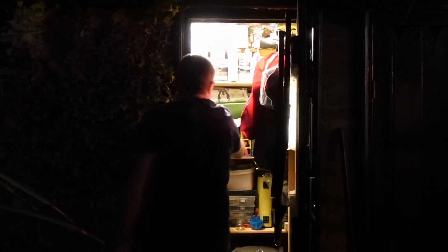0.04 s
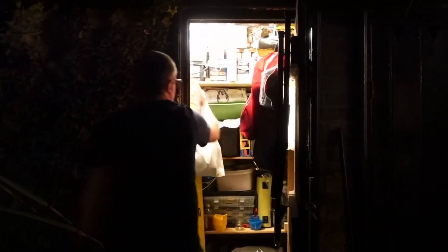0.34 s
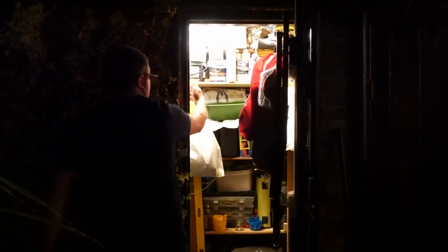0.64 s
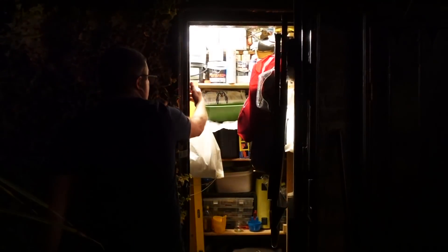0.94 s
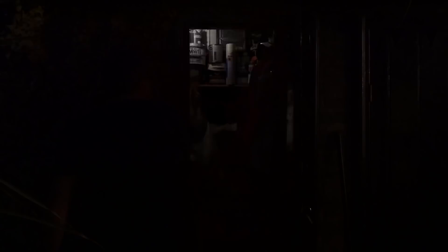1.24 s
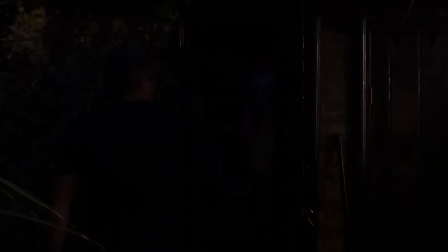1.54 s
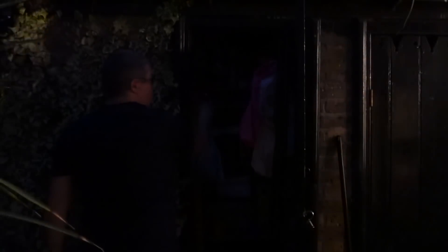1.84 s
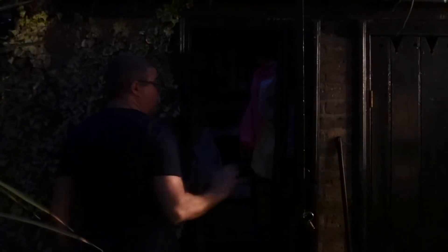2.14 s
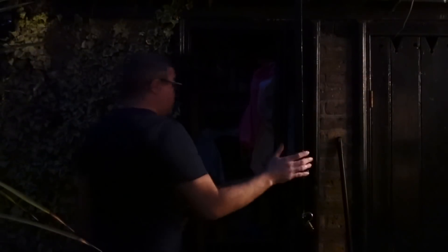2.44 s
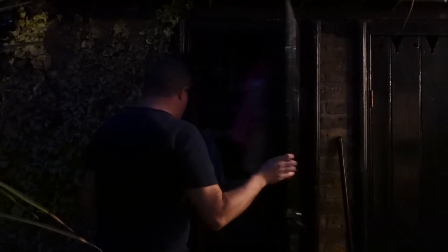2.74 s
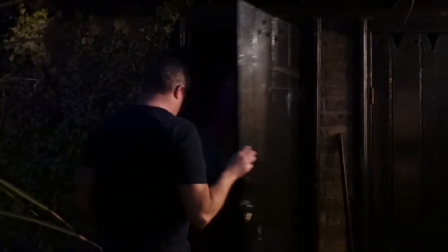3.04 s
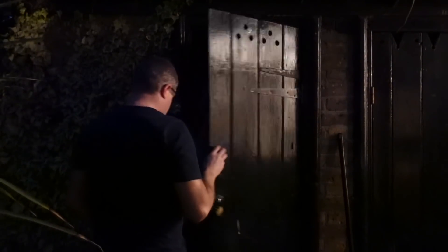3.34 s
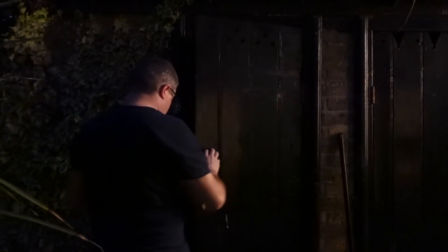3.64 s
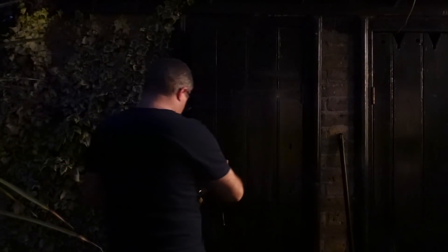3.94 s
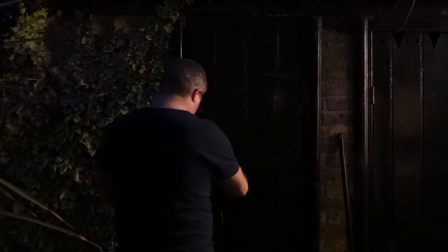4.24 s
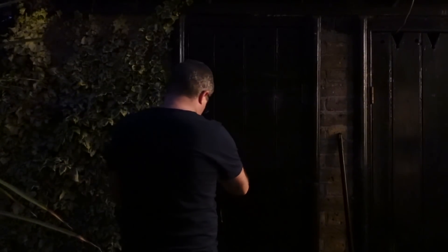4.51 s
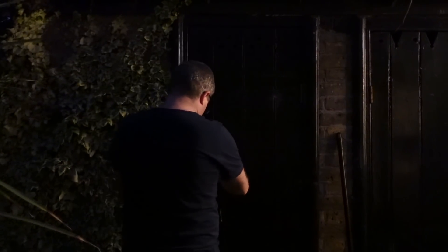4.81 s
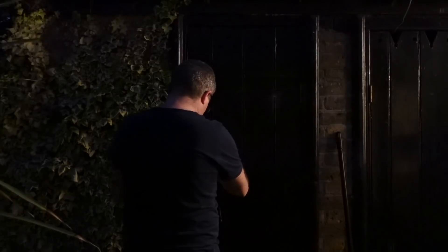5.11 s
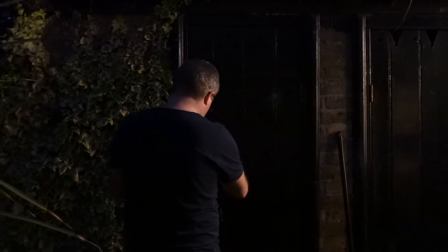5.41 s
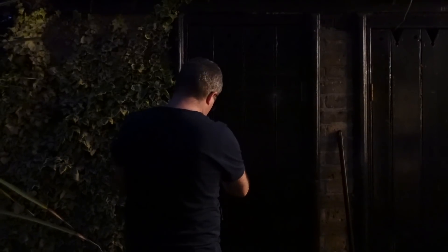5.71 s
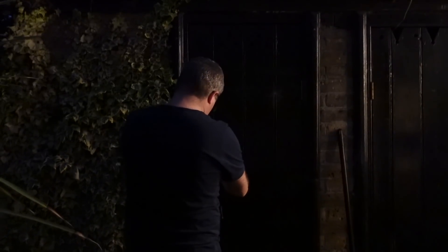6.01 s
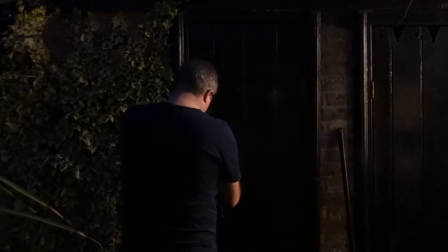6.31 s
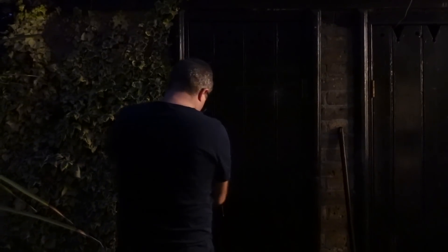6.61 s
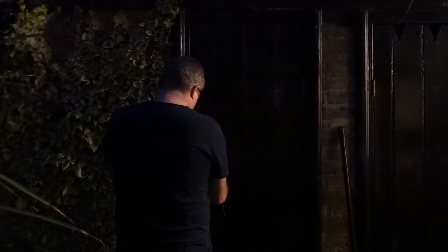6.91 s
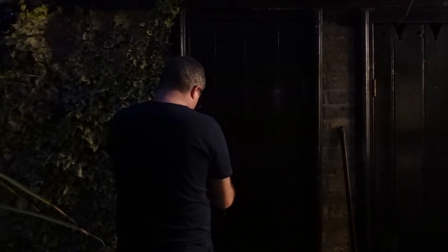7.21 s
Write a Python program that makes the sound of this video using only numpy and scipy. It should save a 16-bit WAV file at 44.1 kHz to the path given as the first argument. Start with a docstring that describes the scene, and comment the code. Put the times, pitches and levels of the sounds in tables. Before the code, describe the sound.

A faint, low rumble of distant town traffic runs throughout, in a small yard where close brick walls add a short echo. In the first second a plastic bag rustles, with light taps of things being set down and brief gritty crunches. Two light switches snap at about 1.3 and 1.7 seconds. Feet crunch on the path around 2 seconds, followed by more rustling, a few taps just after 3 seconds and another crunch at 3.7. Near 4.5 seconds a wooden door, slightly to the right, squeaks softly and shuts with a dull double thud. From 4.9 seconds its iron latch rattles and knocks, growing louder, with a short squeak at 5.6 and a ringing lock spring at 5.9. At 6.1 a stiff bolt gives a loud, high squeal with clacks and a wooden thump. A sharp clack comes at 6.8 and a last clatter at 7.2.

```python
"""A wooden shed door is pushed shut with a squeak and a thud; its iron latch rattles and a stiff bolt squeals
home, dry metal sticking and slipping. Before that, a plastic bag snaps and rustles, fingers tap the door and a
switch, feet crunch on the path and two light switches snap. Each knock is a burst of tiny impacts coloured by
the part it strikes. Close brick walls echo the knocks and squeaks over the low rumble of a distant town at
night."""
import sys
import numpy as np
from scipy import signal
from scipy.fft import rfft, irfft, next_fast_len
from scipy.io import wavfile
from scipy.ndimage import map_coordinates

SR = 44100
rng = np.random.default_rng(int(sys.argv[2]) if len(sys.argv) > 2 else 0)


def put_to_file(sound):
    """Save the sound as 16-bit audio at rate SR, in the file named by the first command-line argument."""
    columns = np.atleast_2d(sound).T  # one column per channel
    safe = np.clip(columns, -1, 1)
    whole_steps = np.round(safe * 32767)
    wavfile.write(sys.argv[1], SR, whole_steps.astype(np.int16))


N = 329100
TOP_HZ = 16000
T = np.arange(SR // 2) / SR  # time within one event, s


def amp(db):
    """Decibels to gain."""
    return 10 ** (np.asarray(db) / 20)


def unit_rms(x):
    """Scale to rms 1."""
    return x / np.sqrt(np.mean(x ** 2) + 1e-20)


def along(points, hz):
    """Interpolate (freq_hz, value) points on a log frequency axis."""
    freq_hz, values = np.transpose(points)
    return np.interp(np.log(hz + 1), np.log(freq_hz), values)


def wobble(rate_hz):
    """Smooth random curve over the whole scene."""
    knots = rng.standard_normal(int(N * rate_hz / SR) + 4)
    return map_coordinates(knots, [np.arange(N) * rate_hz / SR])


def jitter(step_samples):
    """Piecewise linear random curve over one event."""
    knots_s = T[::step_samples]
    return np.interp(T, knots_s, rng.standard_normal(len(knots_s)))


def swells(strokes):
    """Gain of a set of strokes: each climbs 20 dB in rise_s and sinks 20 dB in fall_s."""
    t = np.arange(N) / SR
    gains = [amp(level_db - 20 * np.maximum((peak_s - t) / rise_s, (t - peak_s) / fall_s))
             for peak_s, rise_s, fall_s, level_db in strokes]
    return np.linalg.norm(gains, axis=0)


def add(track, start_s, sound):
    """Mix a sound into a track."""
    part = track[round(start_s * SR):][:len(sound)]
    part += sound[:len(part)]


def coloured(x, curve_db):
    """Minimum-phase filter with gain curve_db(hz)."""
    n = x.shape[-1]
    size = 2 * next_fast_len(n)
    cepstrum = irfft(np.log(amp(curve_db(np.fft.rfftfreq(size, 1 / SR)))))
    cepstrum[1:size // 2] *= 2
    cepstrum[size // 2 + 1:] = 0
    return irfft(rfft(x, size) * np.exp(rfft(cepstrum)))[..., :n]


def ring(modes, jostle_rad):
    """Damped modes struck at slightly random strengths; loose parts jostle their phases."""
    out = np.zeros(len(T))
    for pitch_hz, level_db, t60_s in modes:
        phase = 2 * np.pi * pitch_hz * T + jostle_rad * jitter(300)
        out += amp(level_db + rng.normal() - 60 * T / t60_s) * np.sin(phase)
    return out * (1 - np.exp(-T / 0.0018))


def chatter(length_s, spiky_db, release_s, rise_share):
    """Force of a rough contact, energy 1: a swelling cluster of tiny impacts, then a quick release."""
    grain = amp(spiky_db * jitter(40))
    rise = 1 - np.exp(-T / (rise_share * length_s))
    decay = np.exp(-T / (2 * length_s) - np.maximum(T - length_s, 0) / release_s)
    force = rng.standard_normal(len(T)) * grain * rise * decay
    return force / np.linalg.norm(force)


# Spectrum of a hard contact: freq_hz, gain_db
CLACK_SPECTRUM = [(25, -42.5), (60, -23), (200, -17.5), (450, -2.5), (800, 2), (1500, 0.5), (3000, -0.5),
                  (6000, -3.5), (10000, -6.5), (16000, -16)]


def clack(force, body_db, cutoff_hz, pitch_hz, pitch_db, shared_hz, shared_db, q):
    """A struck part: more body if heavy, brighter if hard, with its own resonance and those of its kind."""
    def colour_db(hz):
        def peak(centre_hz):
            return 1 / (1 + (q * np.log((hz + 1) / centre_hz)) ** 2)
        body = along([(1100, body_db), (2400, 0.01)], hz)
        resonances = pitch_db * peak(pitch_hz) + shared_db * sum(map(peak, shared_hz))
        softness = 10 * np.log10(1 + (hz / cutoff_hz) ** 5)
        return along(CLACK_SPECTRUM, hz) + body + resonances - softness
    return coloured(force, colour_db)


# Decay between the near walls: freq_hz, t60_s
YARD_DECAY = [(100, 0.86), (800, 0.4), (2500, 0.28), (6000, 0.27), (14000, 0.24)]


def yard_response(build_up_s=0.0019, far_db=-20, far_t60_s=0.77):
    """Diffuse echo, energy 1: near walls first, then a faint far one."""
    hz, t, noise = signal.stft(rng.standard_normal(len(T)), SR, nperseg=256)
    near = amp(-60 * t / along(YARD_DECAY, hz)[:, None])
    far = amp(far_db - 60 * t / far_t60_s) / (1 + (hz[:, None] / 6000) ** 2)
    echo = signal.istft(noise * np.hypot(near, far), SR, nperseg=256)[1][:len(T)]
    echo *= 1 - np.exp(-T / build_up_s)
    return echo / np.linalg.norm(echo)


# Stereo width of the echo: freq_hz, side_re_mid_db
ECHO_SPREAD = [(80, -18), (400, -14), (1500, -11), (4500, -5), (9000, -7), (13000, -15)]


def add_in_yard(track, start_s, sound, wet_db):
    """Place a sound with its echoes, which differ a little between left and right."""
    mid, side = (amp(wet_db) * signal.fftconvolve(sound, yard_response())[:len(T)] for _ in range(2))
    width = amp(along(ECHO_SPREAD, np.fft.rfftfreq(len(T), 1 / SR)))
    side = irfft(rfft(side) * width, len(T))
    add(track[0], start_s, sound + mid + side)
    add(track[1], start_s, sound + mid - side)


# Traffic spectrum: freq_hz, density_db
TOWN_SPECTRUM = [(15, -73), (25, -50.5), (99, -5), (190, -2), (223, -6.5), (270, -4.5), (363, -10.5),
                 (560, -9.5), (641, -9), (754, -9), (1190, -13), (1290, -15.5), (2220, -19.5), (3430, -26),
                 (16000, -35.5)]


def town(level_db=-56.5, side_db=-13.5):
    """Distant traffic: a soft rumble, nearly the same on both sides."""
    mid, side = unit_rms(coloured(rng.standard_normal((2, N)), lambda hz: along(TOWN_SPECTRUM, hz)))
    side *= amp(side_db)
    return amp(level_db + 0.6 * wobble(2.9)) * np.array([mid + side, mid - side])


# Strokes of bag and clothing: peak_s, rise_s, fall_s, level_db
RUSTLE_STROKES = [(0.118, 0.23, 0.17, -61), (0.44, 0.16, 0.015, -41.5), (0.915, 0.082, 0.16, -53.5),
                  (2.36, 0.2, 0.29, -58.5), (2.6, 0.036, 0.1, -44), (3.512, .05, 0.063, -50.5),
                  (3.79, .03, 0.3, -63), (4.0, 0.0056, 0.047, -57)]
# Crackle spectrum: freq_hz, gain_db
RUSTLE_SPECTRUM = [(300, -35), (1200, -7), (3000, 5.5), (6000, 5), (10000, 1), (16000, -12)]


def rustle(snaps_per_s=35):
    """A plastic bag and clothing brush past in clumps of fine crackles, with sharper snaps."""
    snaps = signal.fftconvolve(rng.random(N) < snaps_per_s / SR, np.exp(-T / 0.0015))[:N]
    crackles = rng.standard_normal(N) * amp(2.12 * wobble(900) + 1.1 * wobble(94))
    crackles *= 1 + 2 * snaps
    return swells(RUSTLE_STROKES) * unit_rms(coloured(crackles, lambda hz: along(RUSTLE_SPECTRUM, hz)))


# Light knocks: bag snaps, taps on the door and a finger on a switch: start_s, contact_s, relative_db,
# cutoff_hz, pitch_hz
TAPS = [(0.335, 0.002, -53.5, 12000, 6000), (0.559, 0.0026, -43, 5330, 2640),
        (0.804, 0.0067, -45.5, 7600, 2640), (0.835, 0.011, -49, 6350, 2700),
        (1.249, 0.014, -55, 11000, 1940), (2.831, 0.0047, -57.5, 15100, 6400),
        (2.895, 0.017, -53, 2880, 1870), (3.148, 0.0076, -40, 4000, 2040), (3.347, 0.015, -35, 7300, 2190)]


def taps(gain_db=36.5, reference_contact_s=0.0073):
    """Thin taps; heavier things stay in contact longer and have more body; the shortest taps are near by and
    drier."""
    out = np.zeros((2, N))
    for start_s, contact_s, relative_db, cutoff_hz, pitch_hz in TAPS:
        force = chatter(contact_s, spiky_db=4, release_s=0.003, rise_share=0.25)
        doublings = np.log2(contact_s / reference_contact_s)
        body_db = -11.5 + 6 * doublings
        tap = clack(force, body_db, cutoff_hz, pitch_hz, pitch_db=4.5,
                    shared_hz=[1080, 4300], shared_db=5, q=10.5)
        add_in_yard(out, start_s, amp(relative_db + gain_db) * tap, wet_db=-4.5 + 2 * doublings)
    return out


# Footfalls and crumples: start_s, length_s, relative_db
GRIT_AND_BAG = [(0.433, 0.028, -46.5), (0.723, 0.032, -40), (1.987, 0.039, -45.5), (2.241, 0.044, -45),
                (3.488, 0.026, -59), (3.687, 0.033, -38.5)]


def crunches(gain_db=38):
    """Feet press on grit and the bag crumples: bright clusters of tiny impacts."""
    out = np.zeros((2, N))
    for start_s, length_s, relative_db in GRIT_AND_BAG:
        force = chatter(length_s, spiky_db=2.5, release_s=0.012, rise_share=0.11)
        crunch = clack(force, body_db=-12, cutoff_hz=14000, pitch_hz=4200, pitch_db=3.5,
                       shared_hz=[750, 2400], shared_db=1, q=15)
        add_in_yard(out, start_s, amp(relative_db + gain_db) * crunch, wet_db=-8)
    return out


# Light switches: start_s, relative_db, body_db, cutoff_hz, pitch_hz, box_db
SWITCH_SNAPS = [(1.333, -42, -0.5, 18000, 3070, -36), (1.745, -37.5, -6, 11700, 4200, -40.5)]
# Switch box modes: pitch_hz, level_db, t60_s
BOX_MODES = [(592, 0, .24), (2150, -9, .14), (2336, -6, .16), (3187, -6, .15), (4200, -8, .13),
             (5281, -9, .13)]


def switches(gain_db=39):
    """Each switch snaps over and rings in its box."""
    out = np.zeros((2, N))
    for start_s, relative_db, body_db, cutoff_hz, pitch_hz, box_db in SWITCH_SNAPS:
        force = chatter(length_s=0.016, spiky_db=-1, release_s=0.0032, rise_share=0.22)
        snap = clack(force, body_db, cutoff_hz, pitch_hz, pitch_db=9,
                     shared_hz=[600, 2900], shared_db=3.5, q=10.8)
        box = ring(BOX_MODES, jostle_rad=0.5)
        add_in_yard(out, start_s, amp(relative_db + gain_db) * snap, wet_db=-6.5)
        add_in_yard(out, start_s, amp(box_db) * box, wet_db=-19)
    return out


# Sliding metal: start_s, length_s, slip_period_s, start_hz, end_hz, level_db, fade_db_per_s, rasp_share
METAL_SQUEAKS = [(3.04, .045, 0.04, 7060, 7150, -62, 0, .05),
                 (4.497, 0.13, .05, 2596, 2650, -54.5, 0, 0.14),
                 (4.601, 0.089, 0.099, 2680, 2800, -54, 0, .35),
                 (4.925, 0.056, 0.043, 1124, 1170, -46.5, -7, 0.3),
                 (5.64, 0.096, 0.017, 904, 890, -23.5, 247.5, 0.26),
                 (5.747, 0.0085, 0.012, 760, 720, -33, 2, .3),
                 (5.816, .025, 0.021, 733, 691, -39, -2.5, .3),
                 (6.103, 0.021, 0.019, 2986, 2950, -19.5, -3, .15),
                 (6.116, 0.029, .025, 3306, 3255, -10.5, 0.5, 0.3),
                 (6.152, .064, 0.0185, 3293, 3375, -12.5, 202.5, 0.39)]


def squeaks(edge_s=0.00493, waver_share=0.0081, stuck_share=0.44, rasp_per_s=3, scrape_db=-33):
    """Dry metal sticks and slips: a nearly steady pitch that surges with each slip and grows raspier."""
    out = np.zeros((2, N))
    for start_s, length_s, slip_s, start_hz, end_hz, level_db, fade_db_per_s, rasp in METAL_SQUEAKS:
        pitch_hz = np.interp(T, [0, length_s], [start_hz, end_hz]) * (1 + waver_share * jitter(90))
        phase = 2 * np.pi * np.cumsum(pitch_hz) / SR
        tone = np.zeros(len(T))
        for k, harmonic_db in enumerate([0, -18, -27, -36], 1):
            smear = np.clip(k * (rasp + rasp_per_s * T), 0, 1)  # uneven slips widen each harmonic
            strength = np.sqrt(1 - smear ** 2) + smear * (jitter(90) + 1j * jitter(90))
            if k * start_hz < TOP_HZ:
                tone += amp(harmonic_db) * np.imag(strength * np.exp(1j * k * phase))
        scrape = coloured(rng.standard_normal(len(T)), lambda hz: -10 * np.log10(1 + (hz / 5500) ** 2))
        tone += amp(scrape_db) * unit_rms(scrape)
        gate = np.clip(np.minimum(T, length_s - T) / edge_s, 0, 1)
        slips = stuck_share + (1 - stuck_share) * np.sin(np.pi * T / slip_s) ** 2
        add_in_yard(out, start_s, amp(level_db - fade_db_per_s * T) * gate * slips * tone, wet_db=-9.5)
    return out


# Door meets frame: start_s, relative_db, boom_db
DOOR_THUDS = [(4.646, -33.5, -1), (4.708, -38, -5), (5.94, -40.5, -12), (6.147, -31, -1), (6.425, -42, 4.5),
              (7.241, -38.5, -12)]
# Door rubs in its frame: peak_s, rise_s, fall_s, level_db
DOOR_RUBS = [(4.85, 0.32, 0.84, -56.5), (6.35, 1.6, 0.73, -53)]
# Wood on wood: freq_hz, gain_db
WOOD_SPECTRUM = [(25, -51), (50, -8), (78, -13.5), (120, 0), (350, -6), (650, -5.5), (1000, -9),
                 (1500, -31), (5000, -30.5), (16000, -53)]
# Plank modes: pitch_hz, level_db, t60_s
PLANK_MODES = [(113, -2, .38), (172, 1, .27), (215, -4, .15), (255, -1, .34), (361, -1, .3), (470, -8, .15),
               (635, -9, .2)]


def door(force_db=44, planks_db=-5):
    """Dull blows on the frame ring the planks and boom the panel; leaned on, the door rubs softly."""
    out = np.zeros((2, N))
    for start_s, relative_db, boom_db in DOOR_THUDS:
        force = amp(force_db) * chatter(length_s=0.032, spiky_db=-1, release_s=0.022, rise_share=0.05)
        planks = amp(planks_db) * ring(PLANK_MODES, jostle_rad=0.5)
        blow = coloured(force, lambda hz: along(WOOD_SPECTRUM, hz)) + planks
        panel = [(35, -15.5), (80, boom_db), (110, boom_db), (300, 1)]  # freq_hz, gain_db
        thud = coloured(blow, lambda hz: along(panel, hz))
        add_in_yard(out, start_s, amp(relative_db) * thud, wet_db=-9.5)
    rubbing = unit_rms(coloured(rng.standard_normal(N), lambda hz: along(WOOD_SPECTRUM, hz)))
    return out + swells(DOOR_RUBS) * rubbing


# Latch, bolt and lock knocks: start_s, contact_s, relative_db, body_db, cutoff_hz, pitch_hz
IRON_KNOCKS = [(4.877, 0.012, -46, -6.5, 7300, 1140), (4.987, 0.014, -56.5, 2, 4300, 1160),
               (5.165, 0.021, -49.5, 8, 3700, 990), (5.247, 0.022, -44.5, -7, 6000, 1940),
               (5.281, .017, -39, 5, 4670, 1640), (5.389, 0.016, -47, 5, 3400, 1570),
               (5.546, 0.019, -47.5, 12.5, 4400, 1930), (5.622, 0.019, -36.5, -13.5, 5400, 920),
               (5.64, 0.037, -34.5, -0.5, 4500, 1740), (5.757, 0.02, -41.5, -5.5, 3020, 710),
               (5.786, 0.035, -43.5, -5, 3500, 2250), (5.852, 0.027, -29.5, -4.5, 14200, 682),
               (5.934, 0.034, -43, 4, 6700, 654), (6.079, 0.0095, -36.5, -16, 5370, 990),
               (6.095, 0.0067, -25.5, -4, 8450, 1140), (6.104, 0.012, -30, -11.5, 5500, 4210),
               (6.336, 0.014, -46, 10.5, 2810, 1880), (6.772, 0.021, -26.5, -2, 8000, 2810),
               (6.978, 0.0082, -45, 6, 6200, 800), (7.23, 0.013, -52, 5, 6000, 1090),
               (7.238, 0.02, -34.5, 2.5, 9370, 1164), (7.255, .018, -35, 5, 4140, 714)]
# Latch resonances common to all knocks: pitch_hz
LATCH_RESONANCES_HZ = [3110, 4600]
# Blows on the latch bar and on the lock spring: start_s, level_db
BAR_BLOWS = [(4.989, -52), (6.978, -39)]
SPRING_BLOWS = [(5.857, -25.5)]
# Modes of the bar and of the spring: pitch_hz, level_db, t60_s
BAR_MODES = [(764, -22, 0.071), (2490, 7.5, 0.035)]
LOCK_SPRING_MODES = [(1717, -15, .22), (4868, -2, .2), (5873, 0, .18), (6105, -9, .18), (6406, -8, .2),
                     (7924, -5, .2), (8473, -8, .09), (9593, -10, .15), (9814, -12, .15), (12885, -6, .12)]


def ironwork(gain_db=37.5):
    """Latch and bolt clatter on the boards; the latch bar and the lock spring ring on."""
    out = np.zeros((2, N))
    for start_s, contact_s, relative_db, body_db, cutoff_hz, pitch_hz in IRON_KNOCKS:
        force = chatter(contact_s, spiky_db=5, release_s=0.0053, rise_share=0.16)
        knock = clack(force, body_db, cutoff_hz, pitch_hz, pitch_db=8.5,
                      shared_hz=LATCH_RESONANCES_HZ, shared_db=0.5, q=12)
        add_in_yard(out, start_s, amp(relative_db + gain_db) * knock, wet_db=-5)
    for start_s, level_db in BAR_BLOWS:
        add_in_yard(out, start_s, amp(level_db) * ring(BAR_MODES, jostle_rad=0.9), wet_db=-1)
    for start_s, level_db in SPRING_BLOWS:
        add_in_yard(out, start_s, amp(level_db) * ring(LOCK_SPRING_MODES, jostle_rad=0.94), wet_db=-34.5)
    return out


# Balance of sounds at the door: freq_hz, left_minus_right_db
DOOR_PAN = [(100, -0.5), (400, -1), (1100, -2.4), (2500, -3), (5000, -2), (9000, -0.8)]


def from_the_right(x):
    """Pan a little to the right by a level difference that varies with frequency."""
    half_db = along(DOOR_PAN, np.fft.rfftfreq(N, 1 / SR)) / 2
    return irfft(rfft(x) * amp([half_db, -half_db]), N)


def scene():
    """Door and ironwork a little to the right, the rest near the centre."""
    at_door = from_the_right(ironwork() + door() + squeaks())
    near_centre = (taps() + crunches() + switches()) * amp([[-0.4], [0.4]])
    return at_door + near_centre + rustle() + town()


def record(dry):
    """Brick-wall low-pass at TOP_HZ."""
    size = next_fast_len(N + SR // 2)
    passband = np.fft.rfftfreq(size, 1 / SR) < TOP_HZ
    return irfft(rfft(dry, size) * passband, size)[..., :N]


dry = scene()
out = record(dry)
put_to_file(out)
```